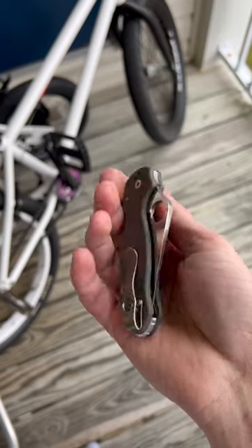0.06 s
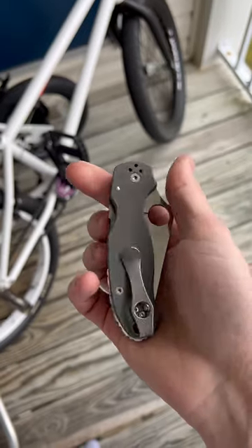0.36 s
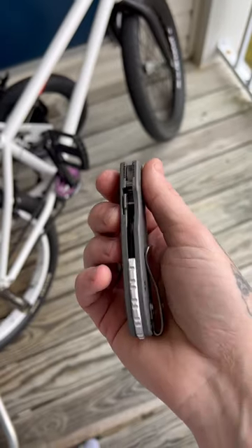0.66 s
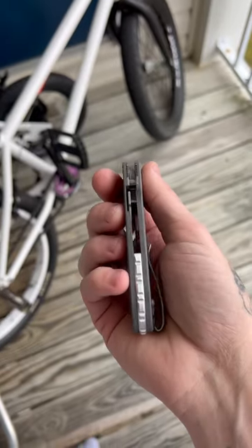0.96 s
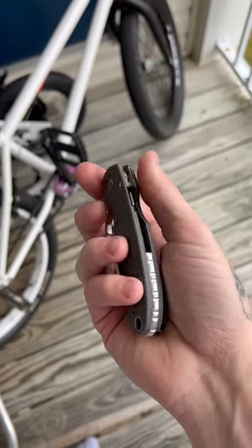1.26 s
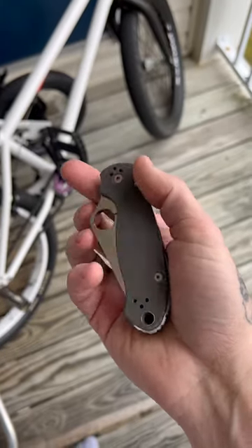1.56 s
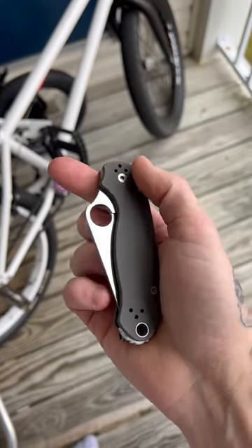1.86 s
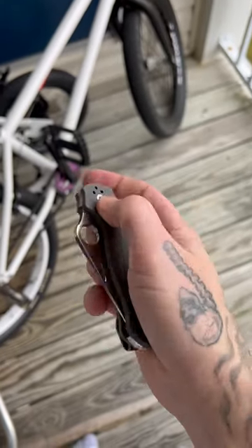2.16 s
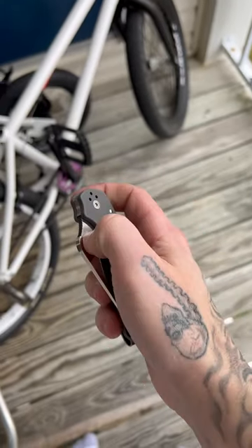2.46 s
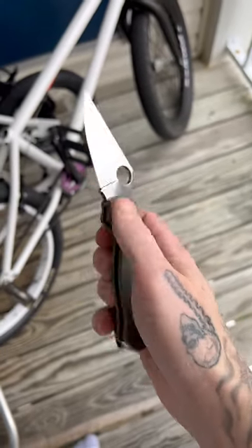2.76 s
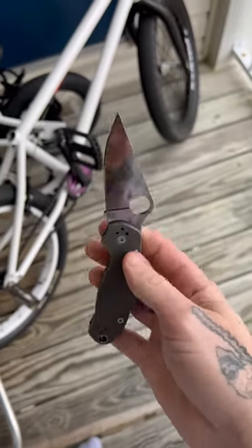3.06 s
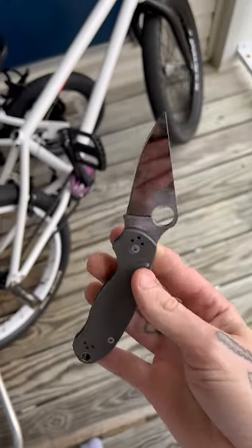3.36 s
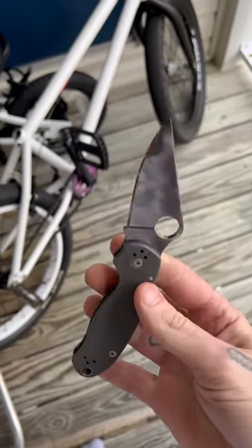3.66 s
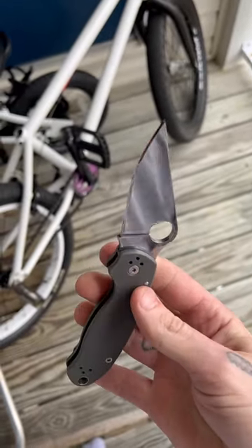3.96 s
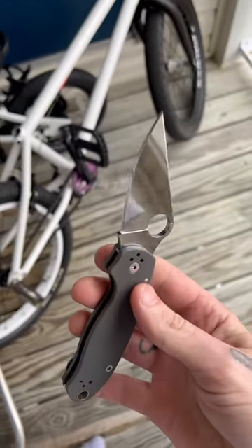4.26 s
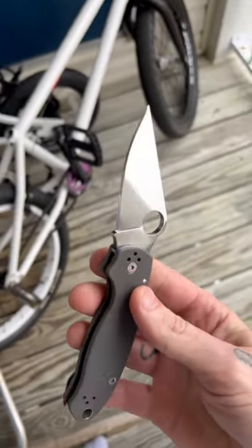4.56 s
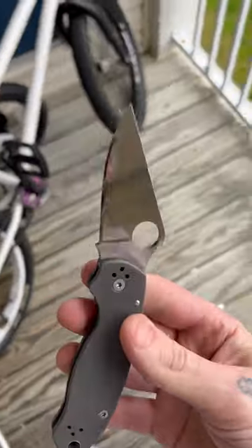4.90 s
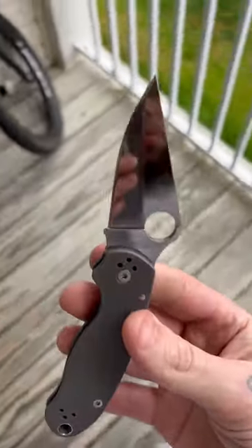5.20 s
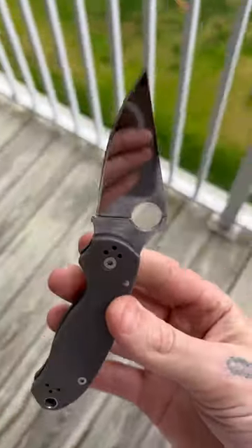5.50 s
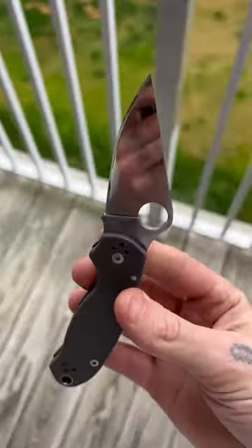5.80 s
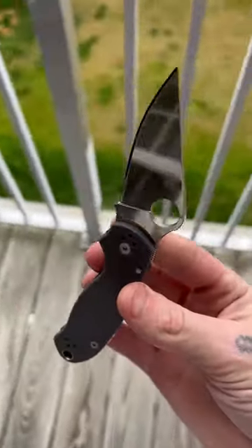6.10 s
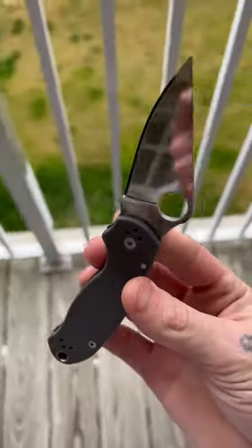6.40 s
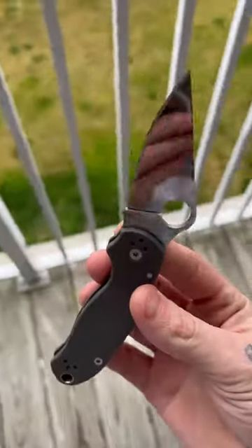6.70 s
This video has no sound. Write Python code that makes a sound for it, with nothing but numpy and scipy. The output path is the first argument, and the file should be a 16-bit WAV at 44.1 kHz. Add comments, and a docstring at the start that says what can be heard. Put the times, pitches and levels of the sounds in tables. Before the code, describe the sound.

A folding knife flicks open with one sharp metallic click outdoors, over faint distant birds and a low hum.

```python
"""A folding knife is turned in the hand, then flicked open: the detent lets go, the lock bar
rubs over the tang and the blade slams into its stop pin, ringing blade and handle.
The porch around it echoes briefly. Small birds whistle far off, blurred by trees and houses,
over traffic rumble, open-air hiss and a machine's mains hum and low drone."""
import sys
import numpy as np
from scipy import signal
from scipy.fft import rfft, irfft
from scipy.io import wavfile

SR = 44100
rng = np.random.default_rng(int(sys.argv[2]) if len(sys.argv) > 2 else 0)


def wav_out(sig):
    """Save sig, one row per channel (or a flat mono array), as 16-bit PCM at SR to the path in sys.argv[1]."""
    wavfile.write(sys.argv[1], SR, np.round(np.clip(np.atleast_2d(sig).T, -1, 1) * 32767).astype(np.int16))


N = 297322
TIME = np.arange(N) / SR

# detent and pivot ticks: start_s, level_db, contact_s
PIVOT_TICKS = [(2.5556, -33.5, .004), (2.5645, -42, .005), (2.5725, -42, .005), (2.5795, -39, .005),
               (2.5858, -33, .005)]
# lock bar, then blade, vibrating until seated: start_s, length_s, pitch_hz, level_db, pan_db
SEATING_SHIVERS = [(2.59327, .0023, 4640, -18.5, 5), (2.5987, .0042, 3283, -14.5, -7)]
# lock bar on tang, blade on stop pin, rebound:
# start_s, force_db, blade_offset_db, crack_offset_db, contact_s, cutoff_hz
OPENING_BLOWS = [(2.59155, -15, -10, 1, .001, 15000), (2.59327, -18, -9, 4, .0016, 7000),
                 (2.5977, -13, -6, 2, .0006, 10000), (2.5984, 0, 0, 1.4, .0014, 20000),
                 (2.6002, -20, 0, 6, .0025, 14000)]
# modes of the swinging blade, open blade and hand-damped handle: pitch_hz, level_db, t60_s, pan_db
FREE_BLADE_MODES = [(1550, -15, .014, 0), (2300, -13, .012, 0), (2900, -8, .016, -3), (4480, -18, .03, 2),
                    (6180, -22, .02, 0), (6850, -18, .025, 0), (7300, -21, .03, 0)]
OPEN_BLADE_MODES = [(3190, -32, .14, -4), (3283, -37, .28, -4), (3360, -31, .06, -5)]
HANDLE_MODES = [(1790, -26.5, .028, 0), (2390, -29, .016, 0), (2700, -30, .014, 0), (2865, -26.5, .022, 0),
                (3660, -20, .016, 1), (3850, -21, .014, 1), (4100, -20.5, .024, 0), (4660, -7, .007, 4.5),
                (4870, -26, .05, 6), (5100, -25, .018, 6), (5480, -27, .014, 4), (7337, -46, .22, 0),
                (7690, -46, .25, 3), (7920, -41, .12, 3), (8380, -47, .2, 0)]
def knife():
    """The swinging blade ticks; blows crack and ring; only the stop pin drives the blade hard."""
    out = np.zeros((2, N))
    blade, handle = ringing(OPEN_BLADE_MODES), ringing(HANDLE_MODES)
    for start_s, level_db, contact_s in PIVOT_TICKS:
        add(out, start_s, gain(level_db) * crack(contact_s))
        add(out, start_s, gain(level_db) * ringing(FREE_BLADE_MODES))
    for start_s, length_s, pitch_hz, level_db, pan_db in SEATING_SHIVERS:
        add(out, start_s, gain(level_db) * pan(pan_db) * shiver(length_s, pitch_hz))
    for start_s, force_db, blade_offset_db, crack_offset_db, contact_s, cutoff_hz in OPENING_BLOWS:
        add(out, start_s, gain(force_db + crack_offset_db) * crack(contact_s, cutoff_hz))
        add(out, start_s, gain(force_db) * (handle + gain(blade_offset_db) * blade))
    return out


# steel contact spectrum: freq_hz, level_db
CRACK_SPECTRUM = [(200, -34), (650, -17), (880, -5), (1130, -1), (1380, -4), (1550, -17), (1750, -1),
                  (2100, 2), (2600, 2), (3200, 3), (3800, 7), (4800, 8.5), (6500, 1), (9000, -1),
                  (10700, 13.5), (11350, 7.5), (11700, 11), (12200, 0), (13000, 2), (13600, 8.5),
                  (14050, 1), (15500, 6), (17000, -10)]
def crack(contact_s, cutoff_hz=7500):
    """Steel strikes steel; sliding contacts are duller."""
    burst = np.convolve(chatter(contact_s), minimum_phase_pulse(CRACK_SPECTRUM))
    burst = signal.lfilter(*signal.butter(2, cutoff_hz, fs=SR), burst)
    return np.array([burst, np.roll(burst, 1)])  # reaches the right one sample later


def chatter(contact_s, size=1024):
    """Tiny contacts within one blow make a ragged burst with a flat spectrum."""
    progress = TIME[:size] / contact_s
    envelope = np.sqrt(progress) * np.exp(-2 * progress)
    burst = rng.standard_normal(size) * envelope
    for _ in range(2):
        phase = np.angle(rfft(burst * np.sqrt(envelope)))
        burst = irfft(np.exp(1j * phase))
    return burst


def ringing(modes, rise_s=.0004):
    """The damped modes of one part build up during contact."""
    t = TIME[:SR // 3]
    ring = sum(pan(pan_db) * gain(level_db - 60 * t / t60_s) * np.sin(2 * np.pi * hz * t) * (-1) ** k
               for k, (hz, level_db, t60_s, pan_db) in enumerate(modes))
    return ring * (1 - np.exp(-t / rise_s))


def shiver(length_s, pitch_hz):
    """A steel part vibrates and is stopped short as it seats."""
    count = int(length_s * SR)
    return np.sin(2 * np.pi * pitch_hz * TIME[:count]) * signal.windows.tukey(count, .45)


# finger slides: middle_s, half_length_s, level_db, centre_hz, width_octaves
FINGER_SLIDES = [(0.445, 0.035, -76, 5500, 1), (0.507, .08, -82, 12000, .3), (0.578, 0.05, -74, 5970, .8),
                 (0.748, .023, -74, 4800, .7), (1.063, 0.089, -82, 12000, 0.18),
                 (1.233, .04, -78, 6300, .35), (1.402, 0.064, -68, 5500, 0.35),
                 (1.405, 0.039, -62.5, 2300, 0.23), (1.468, .04, -70.5, 5500, 1.3),
                 (1.599, .065, -80, 11500, .4), (1.707, .06, -81, 8500, .6), (2.034, .12, -77.5, 6460, .7),
                 (2.39, .055, -66, 3100, 0.98), (2.544, 0.067, -66, 7150, 1.1), (3.2, 0.48, -81, 6900, .55),
                 (4.072, .016, -76, 9900, 0.43), (5.685, .045, -77, 4480, .45),
                 (5.827, .08, -66, 5020, 1.04), (6.251, 0.069, -69, 6000, .75), (6.608, .3, -69, 4200, .85)]
def fingers():
    """Fingertips slide over the handle as the knife is turned."""
    out = np.zeros((2, N))
    for middle_s, half_length_s, level_db, centre_hz, width_octaves in FINGER_SLIDES:
        slide = stroke(2 * half_length_s, centre_hz, width_octaves)
        add(out, middle_s - half_length_s, gain(level_db) * slide)
    return out


def stroke(length_s, centre_hz, width_octaves, grain_db=2.8):
    """Skin catches and slips on the textured handle."""
    count = int(length_s * SR)
    hz = np.fft.rfftfreq(count, 1 / SR) + 1
    band = np.exp(-(np.log2(hz / centre_hz) / width_octaves) ** 2 / 2) / np.sqrt(hz)
    slips = rng.standard_normal((2, SR))[:, :count]
    slips *= gain(grain_db * (wander(count, 400) + .5 * wander(count, 50)))
    crossfed = slips + .5 * slips[::-1]
    return unit_rms(irfft(rfft(crossfed) * band, count)) * np.hanning(count) ** 2


# porch decay: freq_hz, t60_s
PORCH_DECAY = [(700, .24), (1850, .27), (3300, .27), (6000, .28), (8000, .28), (13000, .23)]
# porch tail spectrum: freq_hz, level_db
PORCH_SPECTRUM = [(500, -9), (1100, -6), (1520, 2), (1800, -3), (2400, -10), (3300, -10), (3800, -6),
                  (4400, -9), (5100, -8.5), (6500, 0), (8600, 4.5), (10700, -12), (12300, -5), (14200, -11),
                  (15500, -8)]
# single reflections: delay_s, level_db, pan_db
PORCH_ECHOES = [(.0118, -21, 2), (.0160, -23, 2), (.0228, -16, -2), (.0298, -19, 0)]
def porch(direct, echo_band_hz=(2400, 5500)):
    """Boards, wall and roof return a few dull echoes and a short bright tail."""
    out = direct + reverberate(direct, tail(PORCH_DECAY, PORCH_SPECTRUM, rise_s=.007))
    dull = signal.lfilter(*signal.butter(1, echo_band_hz, "bandpass", fs=SR), direct)
    for delay_s, level_db, pan_db in PORCH_ECHOES:
        add(out, delay_s, gain(level_db) * pan(pan_db) * dull)
    return out


# yard decay: freq_hz, t60_s
YARD_DECAY = [(2000, .55), (9000, .42)]
def birds(direct_db=-4.5, leaves_db=-5.5, leaves_t60_s=.07, yard_db=-3):
    """Distant calls, smeared by trees and houses."""
    calls = chirps() + pips() + long_whistle() + sliding_song() + buzzy_calls() + trill()
    leaves = tail([(4000, leaves_t60_s)], [(4000, leaves_db)], rise_s=.001)
    yard = tail(YARD_DECAY, [(2000, yard_db)], rise_s=.005)
    return gain(direct_db) * calls + reverberate(calls, leaves + yard)


# small birds' notes and one low call: start_s, length_s, pitch_hz, glide_hz, level_db
DISTANT_NOTES = [(.25, .07, 2980, -800, -70.5), (.585, .1, 4260, 120, -73), (1.085, .1, 3750, -1400, -71),
                 (1.105, .06, 4300, -200, -70.5), (1.48, .12, 4480, -400, -76),
                 (1.63, .12, 4850, -1000, -76), (2.008, .05, 4300, 60, -70), (2.76, .06, 2850, -200, -66),
                 (3.19, .12, 2720, -300, -70), (4.625, .03, 4420, 40, -65.5), (4.68, .025, 4420, 0, -69),
                 (5.03, .07, 3760, -150, -73), (5.15, .085, 3850, -150, -68.5),
                 (5.28, .08, 3720, 100, -71.5), (5.35, .06, 4150, -250, -73), (5.45, .045, 3420, 100, -72),
                 (5.488, .045, 3650, 150, -69.5), (5.65, .05, 2800, 200, -74), (5.92, .05, 4400, 300, -76),
                 (5.97, .06, 2750, 100, -75), (6.104, .085, 4930, -170, -79), (6.32, .06, 3050, -200, -74),
                 (6.36, .15, 1440, 100, -66), (6.462, .045, 4350, 0, -72.5), (6.585, .04, 1950, -150, -66)]
def chirps():
    """Small birds' gliding notes, plus one faint, low, distant call near the end."""
    out = np.zeros(N)
    for start_s, length_s, pitch_hz, glide_hz, level_db in DISTANT_NOTES:
        add(out, start_s, gain(level_db) * glide(length_s, pitch_hz, glide_hz, buzz_hz=65))
    return out


# lower bird's notes: start_s, glide_hz, level_db
BIRD_PIPS = [(2.058, -700, -66), (2.349, -550, -66), (2.394, -900, -64), (2.86, 183, -66),
             (2.998, -100, -59), (6.112, -270, -73), (6.46, 350, -69)]
def pips(length_s=.045, pitch_hz=2500):
    """A lower bird pips around one pitch."""
    out = np.zeros(N)
    for start_s, glide_hz, level_db in BIRD_PIPS:
        add(out, start_s, gain(level_db) * glide(length_s, pitch_hz, glide_hz, buzz_hz=30))
    return out


def long_whistle(start_s=2.075, length_s=.3, pitch_hz=5250, level_db=-72, fade_db_per_s=55):
    """One held note swells and dies away."""
    out = np.zeros(N)
    note = glide(length_s, pitch_hz, glide_hz=0, buzz_hz=40)
    add(out, start_s, note * gain(level_db - fade_db_per_s * TIME[:len(note)]))
    return out


# thin song, sung twice: slide_start_s, last_note_hz, level_db, arch_offset_db
SONG_PHRASES = [(2.936, 5830, -71.5, -6), (3.872, 5620, -71.5, 2)]
# its notes: offset_s, length_s, start_ratio, middle_ratio, end_ratio, offset_db, buzz_hz
PHRASE_NOTES = [(-.26, .23, 1.57, 1.69, 1.63, -11, 38), (-.072, .06, 1.66, 1.58, 1.39, -2, 170),
                (0, .064, 1.33, 1.15, 1.02, 1, 260), (.052, .075, 1.005, 1, 1, 0, 22)]
def sliding_song():
    """A very high arch drops in two slides onto a held note."""
    out = np.zeros(N)
    for slide_start_s, last_note_hz, level_db, arch_offset_db in SONG_PHRASES:
        for offset_s, length_s, *ratios, offset_db, buzz_hz in PHRASE_NOTES:
            note = whistle(length_s, last_note_hz * np.array(ratios), buzz_hz)
            note_db = level_db + offset_db + arch_offset_db * (offset_s < 0)
            add(out, slide_start_s + offset_s, gain(note_db) * note)
    return out


# high calls: start_s, buzz_length_s, level_db
BUZZY_CALLS = [(4.41, 0.19, -66.5), (5.17, 0.17, -70), (5.97, .22, -68.5), (6.686, .17, -65)]
def buzzy_calls(flick_s=.055, flick_hz=(6300, 7750, 8300), flick_offset_db=-8.5, buzz_hz=130):
    """An upward flick runs into a high, rising buzz."""
    out = np.zeros(N)
    for start_s, buzz_length_s, level_db in BUZZY_CALLS:
        flick = whistle(flick_s, flick_hz, buzz_hz)
        buzz = glide(buzz_length_s, pitch_hz=7300, glide_hz=500, buzz_hz=buzz_hz)
        add(out, start_s, gain(level_db + flick_offset_db) * flick)
        add(out, start_s + flick_s, gain(level_db) * buzz)
    return out


def trill(start_s=2.779, syllables=17, period_s=.0972, slowing_s=.00088):
    """Each syllable slurs down from a high note; the series swells, fades, slows and creeps sharp."""
    peak_s, peak_db, slope_db_per_s, sharpen_per_s = 3.95, -66, 6, .03
    lead_s, lead_hz, lead_offset_db = .035, 4200, -2.5
    slur_s, slur_hz = .062, np.array([4300, 3050, 2550])
    out = np.zeros(N)
    for k in range(syllables):
        level_db = peak_db - slope_db_per_s * abs(start_s - peak_s)
        pitch_ratio = 1 + sharpen_per_s * (start_s - peak_s)
        lead = glide(lead_s, pitch_ratio * lead_hz, glide_hz=0, buzz_hz=105)
        slur = whistle(slur_s, pitch_ratio * slur_hz, buzz_hz=105, flutter_db=3)
        add(out, start_s - lead_s / 2, gain(level_db + lead_offset_db) * lead)
        add(out, start_s, gain(level_db) * slur)
        start_s += period_s + (k + 1) * slowing_s
    return out


def whistle(length_s, pitches_hz, buzz_hz, flutter_db=4):
    """A near-sine note bends through three pitches; its pitch flutters by 1.9 * buzz_hz rms."""
    count = int(length_s * SR)
    contour_hz = np.polyval(np.polyfit([0, .5, 1], pitches_hz, 2), np.linspace(0, 1, count))
    note = sine(contour_hz + 1.9 * buzz_hz * wander(count, 380))
    note *= gain(flutter_db * wander(count, 70))
    return unit_rms(note) * signal.windows.tukey(count, .5)


def glide(length_s, pitch_hz, glide_hz, buzz_hz):
    """A whistle slides evenly through a pitch."""
    return whistle(length_s, (pitch_hz - glide_hz / 2, pitch_hz, pitch_hz + glide_hz / 2), buzz_hz)


def chorus(level_db=-79, flurry_db=-68.5, flurry_s=5.2, flurry_width_s=.21):
    """The farthest birds twitter throughout; a higher flurry swells and fades once."""
    swell = gain(flurry_db) * np.exp(-((TIME - flurry_s) / flurry_width_s) ** 2 / 2)
    flurry = twitter((flurry_s - .5, flurry_s + .5), low_hz=2680, high_hz=5370, count=160)
    steady = twitter((0, N / SR), low_hz=2400, high_hz=4600, count=260)
    return gain(level_db) * steady + swell * flurry


def twitter(span_s, low_hz, high_hz, count, chirp_s=.04, spread_db=6, t60_s=.35):
    """Random chirps arrive only as reverberation, at unit rms over their span."""
    out = np.zeros(N)
    for k, (jitter, pitch, slope, strength) in enumerate(rng.random((count, 4))):
        pitch_hz = low_hz + (high_hz - low_hz) * pitch
        chirp = glide(chirp_s, pitch_hz, glide_hz=1800 * (slope - .5), buzz_hz=110)
        add(out, np.interp(k + jitter, [0, count], span_s), gain(spread_db * strength) * chirp)
    blur = reverberate(out, tail([(4000, t60_s)], [(4000, 0)], rise_s=.005))
    return unit_rms(blur) * np.sqrt((span_s[1] - span_s[0]) * SR / N)


# traffic and air spectra: freq_hz, relative_db
RUMBLE_SPECTRUM = [(15, -33), (28, -12.5), (38, -1), (55, 2), (70, -1), (92, -6), (125, -1), (150, -3.5),
                   (195, -4.5), (300, -8.5), (440, -11.5), (550, -18.5), (850, -17), (1200, -61.5)]
HISS_SPECTRUM = [(500, -14), (780, -7), (960, 3.5), (1500, -1), (2200, -7), (3200, -13.5), (4300, -19.5),
                 (5500, -26), (7500, -28.5), (8600, -26.5), (11000, -33), (14000, -41), (16000, -58)]
def outdoors(rumble_db=-50, hiss_db=-63, swell_db=1, deep_hz=87.5, deep_drop_db=3.5):
    """Far traffic and open air grow slowly louder; the deepest rumble thins at the railing."""
    rumble_db_per_s, hiss_db_per_s = .23, .13
    from_middle_s = TIME - TIME.mean()
    drift_db = swell_db * wander(N, 1.8)
    rumble = air_noise(RUMBLE_SPECTRUM) * gain(rumble_db + rumble_db_per_s * from_middle_s + drift_db)
    hiss = air_noise(HISS_SPECTRUM) * gain(hiss_db + hiss_db_per_s * from_middle_s + drift_db)
    deep = signal.sosfiltfilt(signal.butter(6, deep_hz, fs=SR, output="sos"), rumble)
    return rumble - deep + deep * gain(-deep_drop_db * toward_railing()) + hiss


# likeness of the air at the two ears: freq_hz, coherence
EAR_COHERENCE = [(50, .996), (130, .99), (300, .98), (400, .8), (540, .35), (1000, .72), (2000, .55),
                 (5000, .12), (12000, .12)]
def air_noise(spectrum):
    """Coloured noise, alike at both ears in the bass and less so higher up."""
    hz = np.fft.rfftfreq(N, 1 / SR)
    left, independent = rfft(rng.standard_normal((2, N)))
    coherence = at_freq(EAR_COHERENCE, hz)
    right = coherence * left + np.sqrt(1 - coherence ** 2) * independent
    return unit_rms(irfft(np.array([left, right]) * gain(at_freq(spectrum, hz)), N))


# mains hum, and drone beside the wall: time_s, level_db
HUM_LEVELS = [(0, -53.5), (.7, -61), (2.2, -54.5), (3.7, -54.5), (4.05, -75), (4.7, -60.5), (4.95, -50.5),
              (6.3, -54.5), (6.74, -48.5)]
DRONE_LEVELS = [(0, -62), (1.5, -56), (6.74, -55)]
def machine(hum_hz=120, hum_trim_db=-1, drone_hz=72, drone_drop_db=9):
    """A distant machine's mains hum wavers over an unsteady drone that falls away at the railing."""
    hum_db = np.interp(TIME, *np.transpose(HUM_LEVELS)) + hum_trim_db
    drone_db = np.interp(TIME, *np.transpose(DRONE_LEVELS)) - drone_drop_db * toward_railing()
    hum = sine(hum_hz + 1.2 * wander(N, 3.6)) * gain(hum_db)
    drone = sine(drone_hz + 4 * wander(N, 10)) * gain(drone_db)
    throb = unit_rms(1 + .52 * wander(N, 7))
    return np.sqrt(2) * (hum + drone * throb)


def toward_railing(middle_s=5.35, length_s=.5):
    """The listener's position: 0 at the wall, 1 at the railing."""
    return np.clip((TIME - middle_s) / length_s + .5, 0, 1)


def tail(decay, spectrum, rise_s):
    """Dense reflections, different at each ear, each band dying at its own rate."""
    hz, t, bands = signal.stft(rng.choice([-1., 1.], (2, SR)), SR, nperseg=256)
    rate = np.log(1000) / at_freq(decay, hz)[:, None]
    envelope = np.exp(-rate * t) * np.sqrt(2 * rate / SR)
    bands = bands * gain(at_freq(spectrum, hz)[:, None]) * envelope
    reflections = signal.istft(bands, SR, nperseg=256)[1][:, :SR]
    return reflections * (1 - np.exp(-(TIME[:SR] / rise_s) ** 2))


def reverberate(sound, response):
    """Convolves with a stereo impulse response."""
    return signal.fftconvolve(np.atleast_2d(sound), response, axes=1)[:, :N]


def minimum_phase_pulse(spectrum, size=2048):
    """The sharpest one-sided pulse with this spectrum."""
    hz = abs(np.fft.fftfreq(size, 1 / SR))
    log_gain = np.log(gain(at_freq(spectrum, hz)))
    return np.fft.ifft(np.exp(np.conj(signal.hilbert(log_gain)))).real


def wander(count, rate_hz):
    """Smooth noise, rms near one, up to about rate_hz."""
    size = max(count, 8192)
    lowpass = np.exp(-(np.fft.rfftfreq(size, 1 / SR) / rate_hz) ** 2)
    return unit_rms(irfft(rfft(rng.standard_normal(size)) * lowpass, size))[:count]


def at_freq(points, hz):
    """Interpolates on a log-frequency axis."""
    freq_hz, values = np.transpose(points)
    return np.interp(np.log(hz + 1), np.log(freq_hz + 1), values)


def sine(pitch_hz):
    return np.sin(2 * np.pi * np.cumsum(pitch_hz) / SR)


def gain(db):
    return 10 ** (np.asarray(db) / 20)


def unit_rms(x):
    return x / np.sqrt(np.mean(x ** 2) + 1e-20)


def pan(pan_db):
    """Stereo gains; pan_db is left minus right."""
    return gain(np.array([[pan_db], [-pan_db]]) / 2)


def add(mix, start_s, sound):
    part = mix[..., max(round(start_s * SR), 0):][..., :sound.shape[-1]]
    part += sound[..., :part.shape[-1]]


def scene():
    """Knife and hand close by, the yard behind."""
    return porch(knife()) + fingers() + birds() + chorus() + outdoors() + machine()


def record(dry, cutoff_hz=16300):
    """A steep low-pass removes the highest treble."""
    lowpass = signal.firwin(255, cutoff_hz, window=("kaiser", 9), fs=SR)
    return signal.oaconvolve(dry, lowpass[None], "same")


dry = scene()
out = record(dry)
wav_out(out)
```